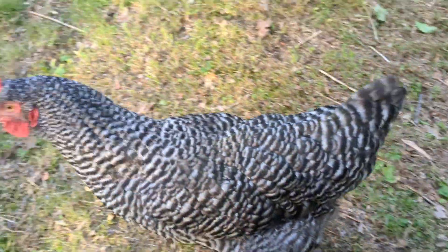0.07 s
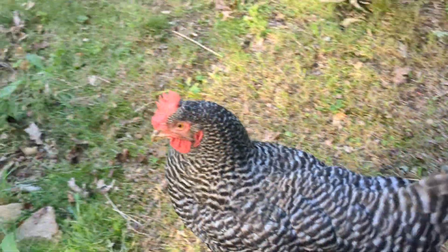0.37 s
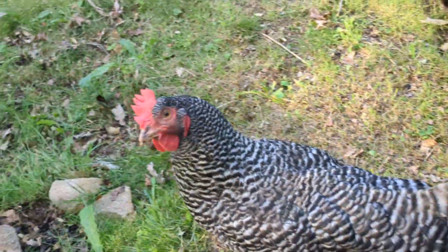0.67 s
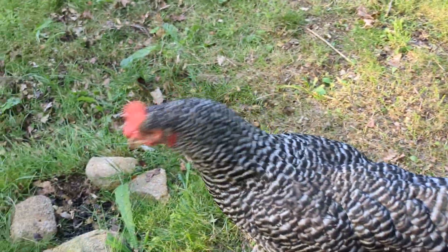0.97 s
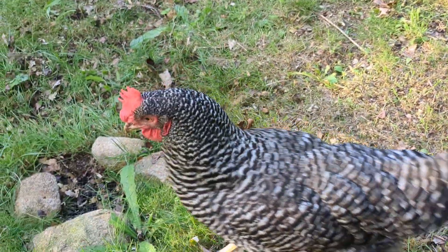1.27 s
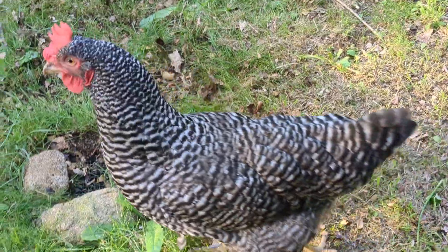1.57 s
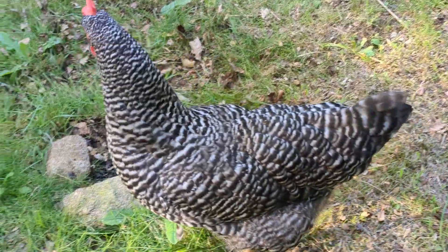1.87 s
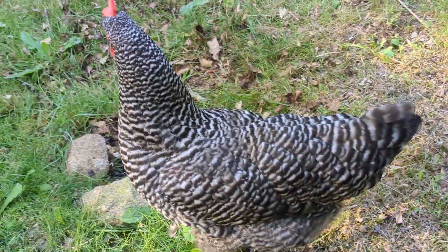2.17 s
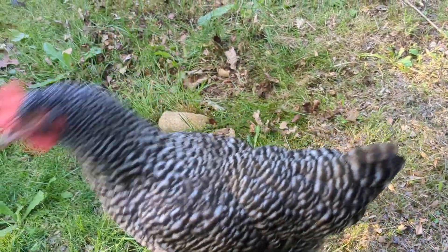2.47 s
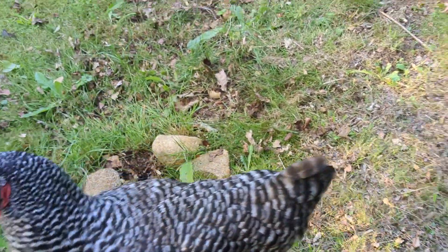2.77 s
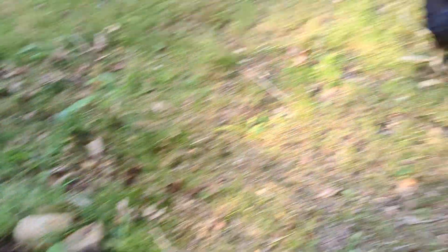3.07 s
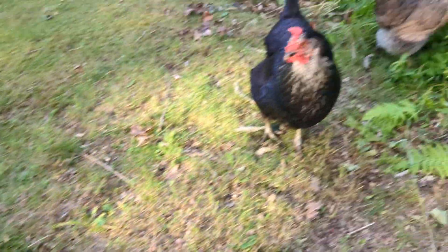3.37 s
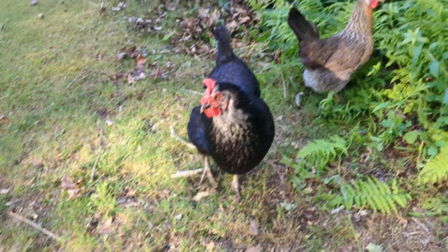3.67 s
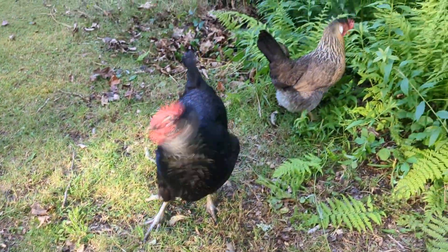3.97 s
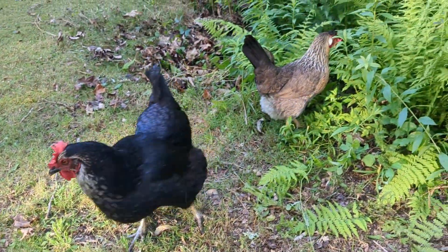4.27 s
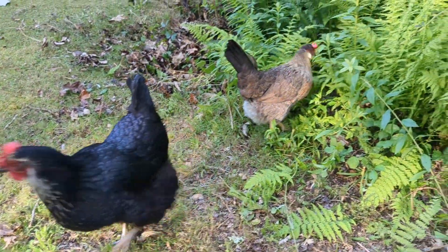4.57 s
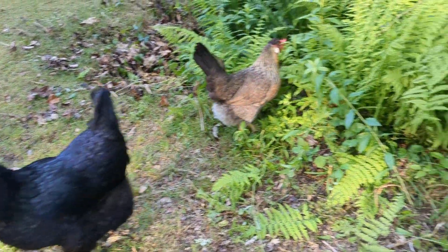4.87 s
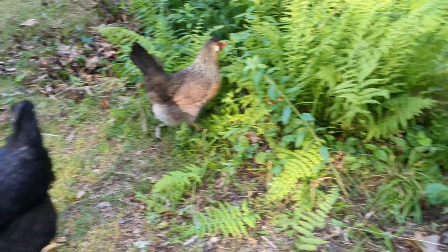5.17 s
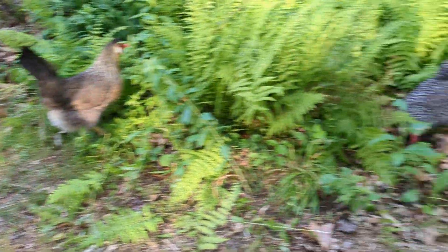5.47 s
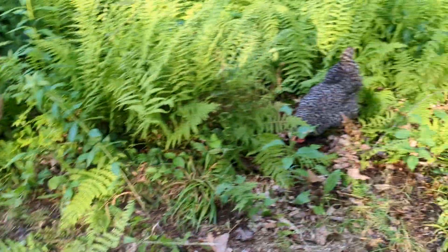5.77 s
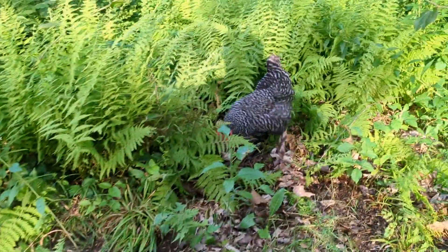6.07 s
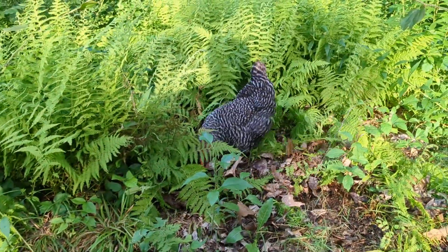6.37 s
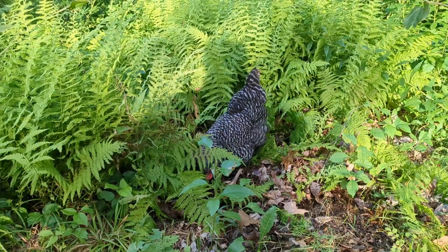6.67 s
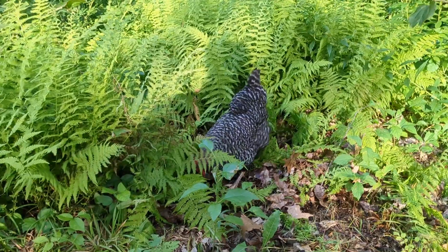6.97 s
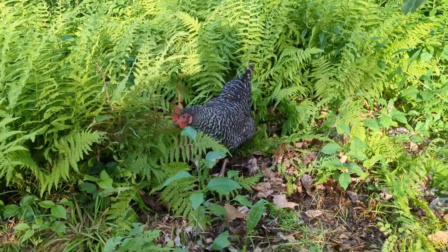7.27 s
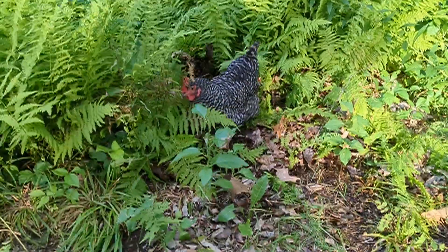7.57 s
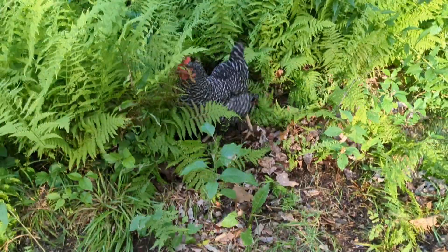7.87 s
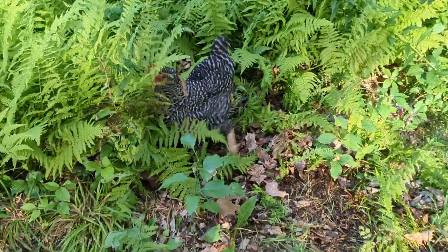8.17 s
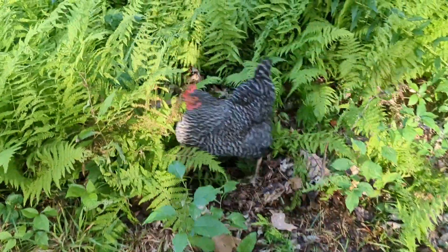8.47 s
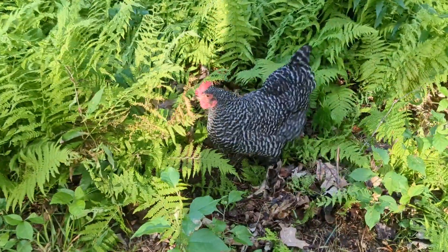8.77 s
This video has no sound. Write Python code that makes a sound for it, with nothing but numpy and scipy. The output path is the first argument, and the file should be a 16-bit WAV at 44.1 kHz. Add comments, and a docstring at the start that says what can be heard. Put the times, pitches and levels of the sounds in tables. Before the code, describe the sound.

A hen croons and clucks softly as hens rustle through grass and scratch dry leaves, with faint songbirds behind.

```python
"""Hens forage in a wooded yard, in front of a stereo pair of microphones. One, close by, croons three
notes, walks through grass and clucks; another, farther off in the ferns, clucks softly and rakes dry
leaf litter with her feet. Each voice is a pulsing membrane shaped by the throat; the rustle is
thousands of tiny leaf contacts, with snapping stalks and scuffing feet. Songbirds whistle back among
the trees, over a faint hush and a low, distant rumble."""
import sys
import numpy as np
from scipy import signal
from scipy.fft import rfft, irfft, next_fast_len
from scipy.io import wavfile

SR = 44100
rng = np.random.default_rng(int(sys.argv[2]) if len(sys.argv) > 2 else 0)


def dump_mix(stems):
    """Bounce the given channels to the path in sys.argv[1] as a 16-bit WAV at rate SR."""
    frames = np.atleast_2d(stems).T  # one column per channel
    limited = np.clip(frames, -1, 1)  # hard clip at full scale
    pcm = np.round(limited * 32767).astype(np.int16)
    wavfile.write(sys.argv[1], SR, pcm)


N = 393813
TIME = np.arange(N) / SR

# the close hen's long opening croon: time_s, pitch_hz, level_db
OPENING_CROON = [(0.105, 404, -39.5), (0.123, 392, -37), (0.139, 413, -37.5), (0.155, 368.5, -27.5),
                 (0.175, 397.6, -38), (0.197, 365, -31.5), (0.265, 379.5, -34), (0.357, 375, -32),
                 (0.375, 356.5, -34.5)]
# it starts hoarse, then clears: time_s, roughness (0-1)
CROON_ROUGHNESS = [(.13, .6), (.143, .04)]
# her two short croons: start_s, length_s, pitch_hz, level_db
LILTING_CROONS = [(0.649, 0.065, 394.7, -30), (0.843, 0.055, 397, -31)]
# each dips, lifts and drops: share_of_note, pitch_ratio
CROON_LILT = [(0, 1.06), (.25, 1.0), (.5, 0.97), (.76, 1.029), (1, 0.89)]
# clucks, close by and (beak closed) farther off:
# start_s, length_s, first_pitch_hz, last_pitch_hz, level_db, roughness (0-1)
CLOSE_CLUCKS = [(2.841, 0.046, 264, 221.5, -33, 0.44), (3.075, 0.041, 288, 217.2, -30.5, 0.4)]
FAR_CLUCKS = [(3.259, 0.025, 247, 232, -46.5, 0.12), (5.399, .036, 255.5, 224, -35.5, 0.2),
              (5.663, 0.045, 210, 208.4, -47, 0.5), (5.853, 0.07, 418, 406, -43, 0.31),
              (6.04, 0.037, 393, 410, -46.5, 0.14)]
# throat resonances for each kind of call: frequency_hz, gain_db
CLOSE_CROON_THROAT = [(200, 23), (380, -1.5), (760, 2), (1130, -14.5), (1520, -13.5), (1900, -32),
                      (2400, -37), (4000, -63)]
CLOSE_CLUCK_THROAT = [(230, -4), (480, 4.5), (690, -2.5), (940, 1), (1200, -12), (1600, -4), (2400, -31),
                      (4500, -35)]
FAR_CLUCK_THROAT = [(220, -22), (430, -15), (560, -32), (690, 1), (830, 1), (940, -1), (1150, -21),
                    (2400, -46)]

# swells of rustle: peak_s, level_db, swell_s, settle_s, swish_over_crackle_db
# those at 3.5 and 4.55 s are a faint, distant mid-pitched hush swelling and fading;
# the others are a hen moving in grass and leaves
RUSTLE_SWELLS = [(0.091, -56, 0.12, 0.079, -29), (0.379, -63.5, 0.075, 0.35, -10.5),
                 (.52, -67, .12, 0.16, -2.5), (0.742, -63.5, 0.17, 0.38, -4.5),
                 (1.04, -45.5, 0.2, 0.31, -7.5), (1.201, -47, .12, 0.1, -5), (1.37, -59.5, 0.14, 0.2, -7.5),
                 (1.62, -47, .13, 0.13, -8), (1.689, -47, 0.18, 0.085, -5), (1.8, -62, 0.13, .2, -3.5),
                 (1.981, -49.5, .2, 0.11, -10), (2.08, -43.5, 0.2, .17, -6), (2.26, -52, 0.054, 0.12, -9),
                 (2.438, -48, 0.078, 0.1, -8), (2.54, -60.5, .1, 0.21, -5), (2.746, -52, 0.099, 0.14, -6.5),
                 (2.85, -60.5, .08, 0.18, -4.5), (3.16, -59, 0.014, 0.24, -12.5), (3.5, -74, 0.46, 0.23, 2),
                 (3.741, -64, 0.21, 0.11, -6), (3.98, -59.5, 0.068, 0.078, -10),
                 (4.55, -79.5, 0.72, 0.46, 7), (4.79, -72.5, 0.19, .06, -12), (5.4, -61, 0.095, 0.037, -11),
                 (5.64, -72.5, 0.18, 0.19, -3), (5.825, -63.5, 0.051, .05, -8),
                 (5.91, -66.5, 0.072, 0.19, -7), (6.155, -43, 0.078, 0.12, -9.5),
                 (6.381, -56.5, 0.25, .22, -12), (6.57, -60, 0.23, .13, -12),
                 (6.94, -72.5, 0.051, 0.091, -5), (7.15, -60.5, 0.13, 0.17, -12.5),
                 (7.395, -47, 0.088, 0.24, -9.5), (7.519, -53, 0.18, 0.19, -6.5),
                 (7.68, -57.5, .12, 0.21, -5.5), (7.83, -49.5, .1, 0.13, -9.5),
                 (8.009, -56.5, 0.13, 0.12, -8.5), (8.14, -56.5, 0.077, 0.04, -6.5),
                 (8.229, -36, 0.057, 0.055, -10), (8.29, -52, 0.17, .28, -9),
                 (8.449, -47.5, 0.053, 0.094, -11.5), (8.595, -48, 0.095, 0.14, -10),
                 (8.679, -54, 0.11, 0.19, -7), (8.9, -58.5, .12, 0.11, -6)]
# where the rustle lies from the microphones: time_s, left_over_right_db, left_lag_ms
RUSTLE_BEARING = [(0, 3, .41), (.9, -1, 0.43), (2.8, -1, 0.47), (3.2, 1.5, -0.5), (5.4, 3, -0.44),
                  (5.9, 4, -.04), (6.15, -2, 0.08), (6.6, 2, -.08), (7.6, 1, -0.094), (8.25, -1.5, -0.026),
                  (8.93, 0, 0)]
# single stalks and leaves breaking: start_s, relative_level_db, relative_body_db
STALK_SNAPS = [(1.2676, -24, -17), (1.5184, -34, -19), (1.9065, -34, -25), (2.0732, -19.5, -13),
               (2.4237, -21, -28), (3.1494, -35, -22), (3.9743, -36, -24), (3.9897, -27, -27),
               (4.2874, -49, -14), (4.4844, -46.5, -9), (4.6865, -41.5, -23), (4.741, -46, -14),
               (4.8094, -42.5, -14), (5.0223, -28.5, -2), (5.8227, -42, -13), (5.974, -44, -20),
               (6.0136, -41, -29), (6.3723, -32.5, -26), (6.541, -36, -17), (6.926, -44, -26),
               (7.925, -29.5, -28), (8.127, -25.5, -34), (8.175, -29, -20), (8.2256, -24, -9),
               (8.2358, -16, -20), (8.443, -27, -28), (8.519, -28.5, -27), (8.7398, -30, -17)]
# tone of grass, dry litter and a snapping stalk: frequency_hz, gain_db
GRASS_SPECTRUM = [(240, -13), (430, 1.5), (600, -8.5), (1200, -6.5), (2400, -3.5), (4000, -4.5),
                  (6000, -9.5), (8000, -10.5), (11000, -3), (13000, -6), (16000, -13)]
LITTER_SPECTRUM = [(180, -20), (300, -14), (433, -9), (565, -13.5), (762, -12), (900, -12.5), (1430, -8.5),
                   (3240, -10), (4090, -14), (5160, -11.5), (8090, -15), (9390, -8.5), (11900, -3),
                   (15200, -19), (16000, -4.5)]
SNAP_SPECTRUM = [(600, -12.5), (2000, -3), (4500, -12.5), (7000, -1), (8500, -10.5), (11000, 9.5),
                 (13000, -6.5), (16000, 5)]
# feet scuffing soil and crushing litter: peak_s, level_db, settle_s, centre_hz
FOOT_SCUFFS = [(1.681, -46, 0.034, 416), (1.684, -43, 0.019, 2470), (6.144, -49.5, 0.12, 2610),
               (7.417, -61.5, 0.23, 820), (8.098, -55.5, 0.12, 1000), (8.234, -51, 0.038, 1500)]

# songbirds among the trees: start_s, length_s, first_pitch_hz, last_pitch_hz, level_db
BIRD_WHISTLES = [(0.432, 0.053, 3710, 3570, -56), (0.499, 0.069, 4780, 5350, -59),
                 (0.542, 0.046, 4150, 3750, -55.5), (0.597, 0.067, 3660, 3660, -54.5),
                 (.628, 0.03, 2305, 1997, -46.5), (1.123, 0.069, 1773, 1980, -52.5),
                 (1.314, 0.043, 3200, 2770, -53.5), (1.34, 0.039, 4150, 3930, -55),
                 (1.758, .073, 4430, 4450, -56.5), (1.86, .07, 6520, 6520, -55),
                 (2.633, 0.059, 2213, 1930, -48), (2.741, 0.1, 1890, 2078, -54),
                 (3.284, 0.071, 1946, 2420, -53.5), (3.384, 0.079, 3570, 3344, -52),
                 (3.454, 0.093, 2765, 3080, -57.5), (5.293, 0.059, 6180, 7150, -67),
                 (7.064, 0.04, 6370, 7100, -64.5), (7.745, .035, 6900, 7150, -59),
                 (8.025, 0.042, 7000, 6980, -70)]
# a bird deep in the wood: start_s, end_s, notes_per_s, lower_pitch_hz, upper_pitch_hz
BIRD_TRILL = (3.93, 4.6, 14, 2250, 3650)
# tone of the distant rumble and of the hush of the trees: frequency_hz, gain_db
RUMBLE_SPECTRUM = [(25, -35.5), (36, -12.5), (50, 6.5), (70, 2.5), (95, 6), (120, 4), (150, -6), (200, -17),
                   (300, -22.5), (500, -56.5)]
HUSH_SPECTRUM = [(300, 10), (550, 0.5), (900, -4), (1400, -0.5), (1900, -4), (2600, -4.5), (5000, -12.5),
                 (7500, -19), (11500, -11), (14000, -14.5), (16000, -20)]
# their slow rise and fall: time_s, level_db
RUMBLE_LEVELS = [(0, -51.5), (1.5, -51.5), (2.2, -47.5), (3.3, -50), (7.3, -51), (8.93, -51)]
HUSH_LEVELS = [(0, -64.5), (1.5, -67), (3.3, -67.5), (4.5, -69), (4.9, -71), (8.93, -71.5)]


def croons():
    """Close to the microphones, a hen holds one nearly level note, then adds two short lilting ones."""
    out = np.zeros(N)
    start_s, end_s = 0.095, 0.3943
    on = (TIME >= start_s) & (TIME < end_s)
    t = TIME[on]
    hz, db = curves(OPENING_CROON, t)
    roughness, = curves(CROON_ROUGHNESS, t)
    level = from_db(db) * fade(t, start_s, end_s, attack_s=0.011, release_s=0.023)
    out[on] = level * syrinx(t, hz, roughness, CLOSE_CROON_THROAT)
    for start_s, length_s, hz, db in LILTING_CROONS:
        on, t, progress = note_span(start_s, length_s)
        ratio, = curves(CROON_LILT, progress)
        level = from_db(db) * fade(t, start_s, start_s + length_s, attack_s=0.0091, release_s=0.0091)
        out[on] += level * syrinx(t, hz * ratio, roughness=0.09, throat=CLOSE_CROON_THROAT)
    return out


def clucks(calls, throat):
    """Brief puffs of a hen's voice, most of them sagging in pitch."""
    out = np.zeros(N)
    for start_s, length_s, first_hz, last_hz, db, roughness in calls:
        on, t, progress = note_span(start_s, length_s)
        hz = last_hz + (first_hz - last_hz) * (1 - progress) ** 2
        out[on] += from_db(db) * np.sin(np.pi * progress ** 1.15) * syrinx(t, hz, roughness, throat)
    return out


def syrinx(t, hz, roughness, throat):
    """Harmonics of a pulsing membrane shaped by the throat; roughness makes the cycles uneven."""
    waver = 0.004 * drift(70, t)
    jitter = 0.14 * roughness * drift(485, t)
    flutter = 0.69 * roughness * drift(600, t)
    phase = 2 * np.pi * np.cumsum(hz * (1 + waver + jitter)) / SR
    harmonics = np.arange(1, 19)[:, None]
    gains = gain_at(throat, harmonics * hz)
    gains /= np.sqrt(np.sum(gains ** 2, axis=0) / 2)
    return np.sum(gains * np.cos(harmonics * phase), axis=0) * (1 + flutter)


def rustle_gains():
    """Overlapping swells add in power: gains of the crisp crackle and of the duller swish."""
    t = TIME[::32]
    crisp_power = swish_power = 1e-12
    for peak_s, db, swell_s, settle_s, swish_db in RUSTLE_SWELLS:
        gain = from_db(db) * swell(t, peak_s, swell_s, settle_s)
        crisp_power += gain ** 2
        swish_power += (gain * from_db(swish_db)) ** 2
    return np.interp(TIME, t, np.sqrt(crisp_power)), np.interp(TIME, t, np.sqrt(swish_power))


def swell(t, peak_s, swell_s, settle_s):
    """The level rises 20 dB over swell_s to a rounded peak and falls as much over settle_s."""
    from_peak = np.abs(t - peak_s) / np.where(t < peak_s, swell_s, settle_s)
    return from_db(-20 * from_peak ** 1.5)


def rustle(spectrum, crisp_gain, swish_gain):
    """Leaves and blades rubbing: a crisp top from their edges, a duller swish from their faces."""
    # a light touch gives separate crackles, a firm stroke a dense hiss
    firmness = crisp_gain / from_db(-49.5)
    contacts_per_s = np.clip(20000 * firmness ** 1.3, 400, 30000)
    edges = crackle(contacts_per_s, spread_db=-0.3, clump_db=1.57, likeness=0.2)
    edges = band(colour(edges, spectrum), 6320, "high")
    faces = crackle(4 * contacts_per_s, spread_db=1.6, clump_db=1.56, likeness=0.3)
    faces = band(colour(faces, spectrum), 8260, "low")
    crisp = edges / np.std(band(edges.mean(axis=0), [8500, 15500], "band"))
    swish = faces / np.std(band(faces.mean(axis=0), [2400, 5500], "band"))
    return crisp * crisp_gain + swish * swish_gain


def crackle(per_s, spread_db, clump_db, likeness):
    """Tiny contacts of uneven size, clumping as each leaf gives way; equally strong at any rate."""
    sizes = from_db(spread_db * np.minimum(rng.exponential(1, (2, N)), 4)) * rng.standard_normal((2, N))
    giving_way = (rng.random(N) < 45 / SR) * np.minimum(rng.exponential(1, N), 2.2)
    surges = signal.lfilter([1], [1, -np.exp(-1 / (0.003 * SR))], giving_way)   # 3 ms decay
    clumps = (1 + 0.85 * surges) * from_db(clump_db * drift(70))
    contacts = rng.random((2, N)) < per_s / SR
    return widen(rms_one(sizes * contacts * clumps / np.sqrt(per_s)), likeness)


def ticks(crisp_gain, per_s=24, lightest_touch_db=-59):
    """Dry bits crack underfoot at random, louder during a hard stroke."""
    over_rustle_db = 6.5 + 2.6 * np.minimum(rng.exponential(1, N), 2)
    sizes = from_db(over_rustle_db) * widen(rng.standard_normal((2, N)), likeness=0.74)
    cracks = rng.random(N) < per_s / SR
    return colour(sizes * cracks * (crisp_gain + from_db(lightest_touch_db)), LITTER_SPECTRUM)


def snaps():
    """A stalk breaks with a sharp crack, and the leaves around it shiver."""
    out, t = np.zeros((2, N)), TIME[:SR // 20]
    shiver = from_db(-15 - 60 * t / 0.008) + from_db(-31 - 60 * t / 0.04)
    for start_s, db, body_db in STALK_SNAPS:
        burst = rng.standard_normal((2, len(t))) * shiver
        burst[:, 0] = 1   # the break itself
        body = from_db(np.clip(body_db + 20, -4, 15))   # thicker stalks crack with more body
        crack = band(burst, 8000, "high") - body * band(burst, 8000, "low")
        at = round(start_s * SR)
        out[:, at:at + len(t)] += (from_db(db + 7) * crack / np.abs(crack).max())[:, :N - at]
    return colour(out, SNAP_SPECTRUM)


def footfalls():
    """A scuff where a foot meets the ground: low on soil, higher on dry leaves."""
    out = np.zeros((2, N))
    grains = crackle(per_s=3000, spread_db=1.8, clump_db=1.5, likeness=0.8)
    for peak_s, db, settle_s, hz in FOOT_SCUFFS:
        scuff = rms_one(band(grains + 1e-18, [hz / 1.31, hz * 1.4], "band"))
        out += from_db(db) * swell(TIME, peak_s, settle_s / 3, settle_s) * scuff
    return out


def songbirds():
    """Warbling whistles glide and settle, reaching the microphones largely by way of the trees."""
    song = np.zeros(N)
    for start_s, length_s, first_hz, last_hz, db in BIRD_WHISTLES:
        on, t, progress = note_span(start_s, length_s)
        glide_hz = last_hz + (first_hz - last_hz) * (1 - progress) ** 2
        phase = 2 * np.pi * np.cumsum(glide_hz * (1 + 0.03 * drift(300, t))) / SR
        song[on] += from_db(db) * np.sqrt(2 * np.sin(np.pi * progress)) * np.sin(phase)
    early = trees(song, t60_s=0.15, gap_s=0.002)
    late = trees(song, t60_s=1.3, gap_s=0.02)
    return 0.4 * song + 0.5 * early + 0.55 * late


def far_trill():
    """Quick rising notes, low and high by turns, from deep in the wood and smeared by the trees."""
    start_s, end_s, per_s, lower_hz, upper_hz = BIRD_TRILL
    notes = (TIME - start_s) * per_s
    hz = np.where(notes % 2 < 1, lower_hz, upper_hz) * (1 + 0.3 * (notes % 1 - 0.5))
    pulses = np.sin(np.pi * notes) ** 2 * (TIME > start_s) * (TIME < end_s)
    song = pulses * np.sin(2 * np.pi * np.cumsum(hz) / SR)
    return from_db(-66) * trees(song, t60_s=0.55, gap_s=0.002)


def trees(x, t60_s, gap_s):
    """Trunks and foliage scatter sparse, dying echoes, a separate set to each microphone."""
    t = TIME[:SR]
    echoes = rng.standard_normal((2, SR)) * (rng.random((2, SR)) < 0.02)
    echoes *= from_db(-60 * t / t60_s) * (t > gap_s)
    echoes /= np.sqrt(np.sum(echoes ** 2, axis=1, keepdims=True))
    return signal.fftconvolve(x[None], echoes, axes=1)[:, :N]


def yard():
    """A distant rumble, alike at both microphones, under the wide, faint hush of the trees."""
    rumble = colour(widen(rng.standard_normal((2, N)), likeness=0.97), RUMBLE_SPECTRUM)
    hush = colour(widen(rng.standard_normal((2, N)), likeness=0.32), HUSH_SPECTRUM)
    return from_db(curves(RUMBLE_LEVELS)[0]) * rumble + from_db(curves(HUSH_LEVELS)[0]) * hush


def place(x, left_db, left_lag_ms):
    """Set a source between the microphones by the level and delay of the left against the right."""
    gains = from_db(np.array([[0.5], [-0.5]]) * left_db)
    left, right = x * gains / gains.mean(axis=0)
    samples, lag = np.arange(N), np.round(left_lag_ms * SR / 1000)
    return np.stack([np.interp(samples - lag, samples, left), right])


def widen(pair, likeness):
    """Two unrelated signals become left and right, with likeness as their correlation."""
    return pair[0] + np.sqrt((1 - likeness) / (1 + likeness)) * pair[1] * np.array([[1], [-1]])


def note_span(start_s, length_s):
    """A note's sample mask, its times and its progress from 0 to 1."""
    on = (TIME >= start_s) & (TIME < start_s + length_s)
    return on, TIME[on], (TIME[on] - start_s) / length_s


def fade(t, start_s, end_s, attack_s, release_s):
    """Attack, hold and release between two moments."""
    return np.clip(np.minimum((t - start_s) / attack_s, (end_s - t) / release_s), 0, 1) ** 1.45


def drift(turns_per_s, t=TIME):
    """Random wander with a spread of about 1."""
    position = (t - t[0]) * turns_per_s
    count = int(position[-1]) + 2
    return np.interp(position, np.arange(count), rng.standard_normal(count))


def curves(rows, t=TIME):
    """Each column after the first, interpolated at t."""
    times, *columns = np.transpose(rows)
    return [np.interp(t, times, column) for column in columns]


def gain_at(spectrum, hz):
    """Gain of a spectrum, read on a log-frequency axis."""
    points_hz, db = np.transpose(spectrum)
    return from_db(np.interp(np.log(hz + 0.0013), np.log(points_hz), db))


def colour(x, spectrum):
    """Minimum-phase filter of unit power gain, rolling off below the spectrum's first point."""
    size = 2 * next_fast_len(N // 2 + 4096)
    hz = np.arange(size // 2 + 1) * SR / size
    skirt = (1 + (spectrum[0][0] / (hz + 1)) ** 4) ** -0.5
    cepstrum = irfft(np.log(rms_one(gain_at(spectrum, hz) * skirt)))
    cepstrum[1:size // 2] *= 2
    cepstrum[size // 2 + 1:] = 0
    return irfft(rfft(x, size) * np.exp(rfft(cepstrum)))[..., :N]


def band(x, edge_hz, kind):
    return signal.sosfilt(signal.butter(2, edge_hz, kind, fs=SR, output="sos"), x)


def from_db(db):
    return 10 ** (np.asarray(db) / 20)


def rms_one(x):
    return x / np.sqrt(np.mean(x ** 2) + 1e-20)


def scene():
    """Hens' voices and feet near the microphones, birds and the hush of the yard behind."""
    croon = croons()
    close_clucks = clucks(CLOSE_CLUCKS, CLOSE_CLUCK_THROAT)
    far_clucks = clucks(FAR_CLUCKS, FAR_CLUCK_THROAT)
    hens = (place(croon, left_db=-0.7, left_lag_ms=-0.17)
            + place(close_clucks, left_db=-1.5, left_lag_ms=-0.34)
            + place(far_clucks, left_db=2.0, left_lag_ms=-0.39))
    echo = from_db(-29) * trees(croon + close_clucks + far_clucks, t60_s=0.58, gap_s=0.012)
    crisp, swish = rustle_gains()
    in_ferns = np.clip(TIME - 5, 0, 1)   # grass gives way to dry litter from 5 to 6 s
    grass = (1 - in_ferns) * rustle(GRASS_SPECTRUM, crisp, swish)
    litter = in_ferns * rustle(LITTER_SPECTRUM, crisp, swish)
    leaves = place(grass + litter + ticks(crisp) + snaps(), *curves(RUSTLE_BEARING))
    return hens + echo + leaves + footfalls() + songbirds() + far_trill() + yard()


def record(dry, cutoff_hz=15800):
    """The top of both microphone channels is cut steeply."""
    return signal.sosfilt(signal.ellip(10, 0.2, 70, cutoff_hz, fs=SR, output="sos"), dry)


dry = scene()
out = record(dry)
dump_mix(out)
```